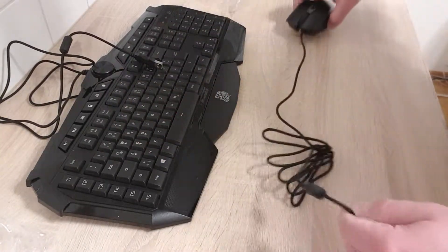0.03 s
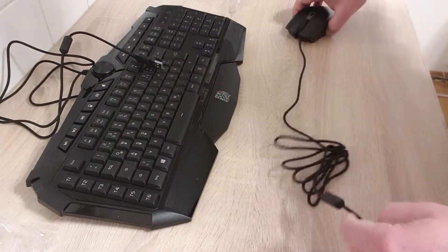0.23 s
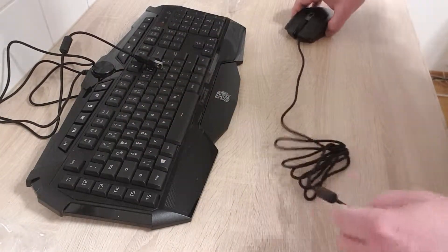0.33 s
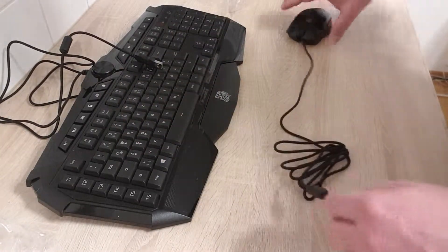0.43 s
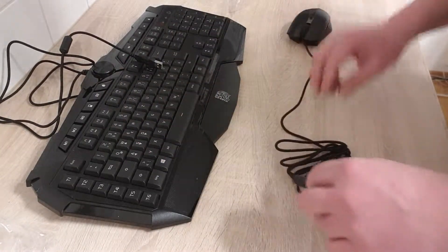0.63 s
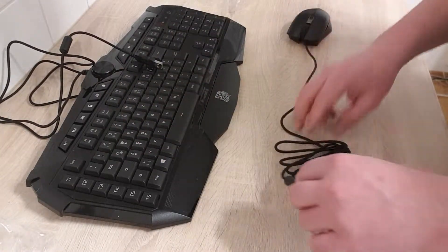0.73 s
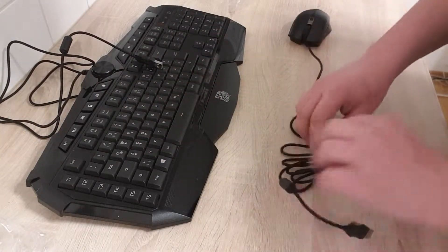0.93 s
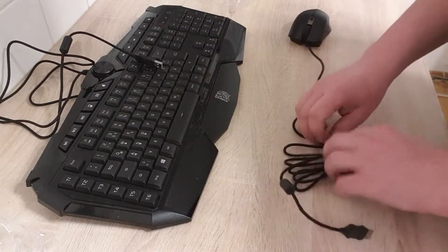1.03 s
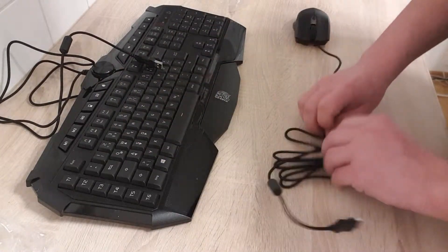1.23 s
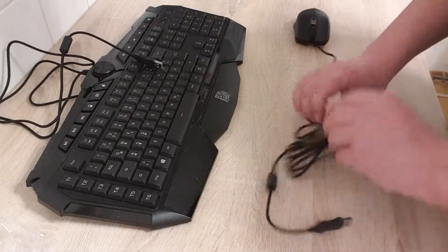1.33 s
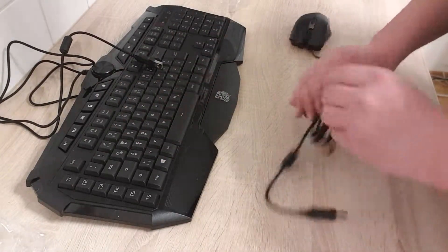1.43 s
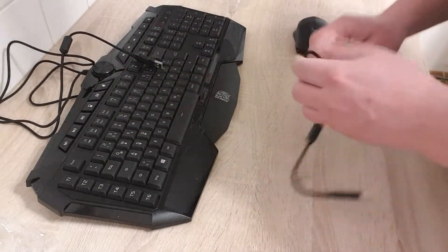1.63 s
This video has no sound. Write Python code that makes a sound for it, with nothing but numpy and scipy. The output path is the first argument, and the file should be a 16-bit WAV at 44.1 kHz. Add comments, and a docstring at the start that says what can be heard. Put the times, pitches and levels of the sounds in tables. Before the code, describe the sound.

A computer mouse lands on a wooden desk in two short knocks, the second louder; then its cable and plug tap, bump and scrape on the wood. Small room, close phone microphone, faint hum.

```python
"""Mouse and cable on a wooden desk

After the tail of an earlier rattle, a computer mouse is set down in two knocks; then hands gather its cable,
whose plug and coils tap and drag on the wood, a hand bumps the desk and fingers rub the sheath. Blows are
short force pulses exciting damped modes; dragging is a dense train of stick-slip ticks; rubbing, leaning and
room tone are filtered noise. A small room adds diffuse decaying reflections, and two steady sines make the
mains hum. The stereo image leans right, as heard by a phone microphone."""
import sys
import numpy as np
from scipy import signal
from scipy.fft import rfft, irfft
from scipy.io import wavfile
from scipy.ndimage import uniform_filter1d

SR = 44100
rng = np.random.default_rng(int(sys.argv[2]) if len(sys.argv) > 2 else 0)


def rack_gain(trim_db):
    """Turn a fader trim in dB into the linear factor to multiply a signal by."""
    fader = np.asarray(trim_db, float)
    return 10 ** (fader / 20)


def wav_out(sig):
    """Save sig, one row per channel (or a flat mono array), as 16-bit PCM at SR to the path in sys.argv[1]."""
    wavfile.write(sys.argv[1], SR, np.round(np.clip(np.atleast_2d(sig).T, -1, 1) * 32767).astype(np.int16))


N = 74970  # length in samples, 1.7 s


def table(rows, hz):
    """Interpolation on a log-frequency axis: reads rows of (f/Hz, value)."""
    r = np.array(rows, float)
    return np.interp(np.log(hz + 1), np.log(r[:, 0]), r[:, 1])


def envelope_db(t, rows):
    """Piecewise-linear level contour: reads rows of (t/s, level/dB)."""
    r = np.array(rows, float)
    return np.interp(t, r[:, 0], r[:, 1])


def colour(x, rows):
    """Linear filtering: multiplies the spectrum by a gain given as rows of (f/Hz, level/dB)."""
    n = x.shape[-1]
    gain = rack_gain(table(rows, np.fft.rfftfreq(n, 1 / SR)))
    return irfft(rfft(x) * gain, n)


def unit(x):
    """Normalisation: scales to rms 1."""
    return x / np.sqrt(np.mean(x ** 2))


def ring(modes, scatter_db=2, detune=0.016, damp=1):
    """Modal superposition: damped sines with chance strength and tuning; damp scales their decay times."""
    m = np.array(modes, float)
    t = np.arange(SR // 3)[:, None] / SR
    chance = rng.standard_normal((2, len(m)))
    hz = m[:, 0] * (1 + detune * chance[0])
    strength = rack_gain(m[:, 1] + scatter_db * chance[1])
    sign = (-1) ** np.arange(len(m))
    decay = 1000. ** (-t / m[:, 2] / damp)
    return (strength * sign * np.sin(2 * np.pi * hz * t) * decay).sum(axis=1)


def crack(db, decay_s):
    """Impact noise: a white burst falling by 1/e in decay_s."""
    n = SR // 3
    return rack_gain(db) * rng.standard_normal(n) * np.exp(-np.arange(n) / SR / decay_s)


def add(out, s, db, contact_ms, body):
    """Impulse response convolution: a half-sine contact force drives a body at time s."""
    k = max(contact_ms * SR / 1000, 1.)
    push = np.sin(np.pi * (np.arange(int(k) + 1) + .5) / (k + 1))
    y = rack_gain(db) * np.convolve(body, push / push.sum())
    i = int(s * SR)
    out[i:i + len(y)] += y[:N - i]


# left-right correlation of diffuse sound: f/Hz, likeness (0-1)
LIKENESS = [(60, 0.91), (125, 0.9), (250, 0.78), (700, 0.1), (2000, 0.13), (6000, 0.11), (15000, .01)]


def pair(size):
    """Partial coherence: mid and side noises give channels alike in the bass, nearly unrelated above."""
    c = np.clip(table(LIKENESS, np.fft.rfftfreq(size, 1 / SR)), 0, 1)
    mid, side = rfft(rng.standard_normal((2, size)))
    mid = mid * np.sqrt((1 + c) / 2)
    side = side * np.sqrt((1 - c) / 2)
    return irfft(np.array([mid + side, mid - side]), size)


# spectral density of the room tone: f/Hz, level/dB per Hz (relative)
TONE_COLOUR = [(18, -34), (30, -18), (60, -14.5), (100, -19.5), (194, -34), (800, -33), (1910, -44),
               (5000, -51.5), (9220, -53), (13700, -47), (16000, -50)]


def room_tone():
    """Stationary background noise: partly coherent noise with a falling spectrum."""
    tone_db = -67.5  # rms before the stereo balance
    return rack_gain(tone_db) * unit(colour(pair(N), TONE_COLOUR))


# mains hum components: f/Hz, level/dB (rms before the stereo balance)
HUM = [(49.5, -62.5), (100, -65)]


def mains_hum(t):
    """Periodic tone: steady sines, each starting at a chance phase."""
    return sum(rack_gain(db) * np.sqrt(2) * np.sin(2 * np.pi * (hz * t + rng.random())) for hz, db in HUM)


# desk top modes, undamped by a hand: f/Hz, level/dB, t60/s
DESK = [(58.2, -20.5, 0.73), (99, -0.5, 0.11), (174, -6.5, 0.084), (215.2, -12.5, 0.1),
        (276.6, -11.5, 0.071), (350.5, -16, 0.24), (433.7, -3.5, 0.033), (536, -2, 0.077),
        (637, -10, 0.084), (797.4, 5, 0.03), (983, 5, 0.027), (1190.5, -3.5, 0.051), (1390, -41, 0.018),
        (1590, -11.5, 0.096)]
# plug and cable modes, undamped by a hand: f/Hz, level/dB, t60/s
PLUG = [(861, -15, 0.045), (1240, -2.5, 0.0063), (1586, -5, 0.031), (1827, -2, 0.018), (1908, -1.5, 0.033),
        (2050, -1.5, 0.021), (2300, 3, 0.012), (2573, 1.5, 0.014), (2845, 3.5, 0.0084), (3460, 8, 0.004),
        (3796, -3, 0.0066)]
# scraping levels: the first list is an earlier sound dying away, the next two are cable drags:
# t/s, level/dB, scrape level/dB, desk level/dB (both relative)
DRAG = [
    [(0, -53.5, -0.5, -18), (.04, -69.5, 13, -11), (.09, -78, 8, 1)],
    [(.715, -38.5, -12, -5), (.76, -47, -1, -19), (.80, -43.5, -15, -2), (.85, -45, -10, -2),
     (.895, -45, -8, -4), (.925, -71, -6, 9), (.99, -73.5, 11, 12), (1.1, -98, -3, -7)],
    [(1.115, -52.5, 0, 6), (1.17, -59.5, 4, -15), (1.2, -55.5, -5, -1), (1.212, -45.5, 8.5, -6.5),
     (1.225, -48, 10, -22), (1.235, -50, 7, 0.5), (1.265, -35, -1.5, -14), (1.28, -45, -1, -17),
     (1.3, -36.5, -4, -26), (1.33, -54, -13, -5), (1.36, -65, -11, -6), (1.42, -77, -15, 15),
     (1.48, -69.5, -12, 5), (1.6, -67, 2, 4.5), (1.7, -75, -12, -5)],
]


def drag(t):
    """Stick-slip friction: uneven ticks ring the hand-damped cable and desk; a thin scrape lies on top."""
    ticks_per_s, scatter_db, damp = 3100, 3.6, 0.65
    slips = rng.random(N) < ticks_per_s / SR
    size = rack_gain(scatter_db * np.minimum(rng.exponential(size=N), 3.5))
    ticks = slips * size * rng.standard_normal(N)

    def excite(modes):
        body = ring(modes, scatter_db=0.5, damp=damp)
        return unit(signal.fftconvolve(ticks, body)[:N])

    cable, desk = excite(PLUG), excite(DESK[2:])
    scrape_colour = [(2500, -8.5), (3500, -2), (4800, -3), (6000, -1), (7500, 0), (9000, -15.5),
                     (15000, -7.5)]
    scrape = rack_gain(-10) * unit(colour(ticks, scrape_colour))
    out = 0
    for rows in DRAG:
        r = np.array(rows, float)
        level, bright, wood = (rack_gain(np.interp(t, r[:, 0], column)) for column in r[:, 1:].T)
        moving = (t >= r[0, 0]) * (t < r[-1, 0])
        out = out + level * moving * (cable + bright * scrape + wood * desk)
    return out


# room decay: f/Hz, t60/s
ROOM_T60 = [(60, 0.32), (200, 0.42), (500, 0.24), (1500, 0.35), (4000, 0.24), (9000, 0.27), (15000, 0.31)]
# room strength: f/Hz, level/dB
ROOM_DB = [(60, -2.5), (250, -0.5), (1000, 2), (2500, -4), (6000, 0.5), (15000, -8.5)]


def room(x):
    """Diffuse reverberation: reflections, strong at first, die away exponentially band by band."""
    onset_s, early_db, early_t60_s = 0.0011, 0.5, 0.095
    size = SR // 2
    t, hz = np.arange(size) / SR, np.fft.rfftfreq(size, 1 / SR)
    spec = rfft(pair(size))
    tail = 0
    for k in range(9):
        f = 60 * 2. ** k
        # triangular band, one octave to either side
        band = np.clip(1 - abs(np.log2(np.clip(hz, 60, 15360) / f)), 0, 1)
        decay = 1000. ** (-t / table(ROOM_T60, f))
        tail = tail + rack_gain(table(ROOM_DB, f)) * irfft(spec * band, size) * decay
    early = 1 + rack_gain(early_db) * 1000. ** (-t / early_t60_s)
    tail = tail * (1 - np.exp(-t / onset_s)) * early
    # broad peaks of the random noise are flattened: 60 Hz averages of power are drawn to 500 Hz averages
    spec = rfft(tail)
    power = abs(spec) ** 2 + 1e-12
    even = np.sqrt(uniform_filter1d(power, size=250) / uniform_filter1d(power, size=30))
    tail = irfft(spec * even, size)[:, :size * 4 // 5]
    return signal.fftconvolve(x[None], tail / np.sqrt(0.031 * SR))[:, :N]


# metal sleeve modes of the plug: f/Hz, level/dB, t60/s
SLEEVE = [(4420, 5.5, 0.0022), (5785, 1.5, 0.0093), (6410, 3.5, 0.0051), (7550, -5.5, 0.0073),
          (9560, -18, 0.012), (12300, -11, 0.0035)]
# taps on the wood, the first three from the earlier rattle, the rest from plug and coils:
# t/s, level/dB, contact/ms, desk level/dB, sleeve level/dB (both relative)
TAPS = [(.0020, -56.5, 0.067, 3.5, 5), (.0100, -68, 0.2, -1, -26), (.0280, -50, 0.25, -7.5, -3),
        (0.7069, -27, 0.05, -13.5, -6), (.7120, -35.5, 0.033, -16, 3.5), (.7180, -36.5, 0.18, -22, -28),
        (0.7199, -24.5, 0.16, -15, -14), (.7300, -32.5, 0.32, -4.5, -25), (0.753, -32, 0.078, -18, -17),
        (0.7892, -27.5, 0.49, -16, -30), (.8380, -35, 0.3, -12, -3.5), (1.1121, -37, .1, -14.5, 6.5),
        (1.119, -49, 0.18, -1.5, -14), (1.128, -52, 0.045, -0.5, -27), (1.158, -40.5, 0.17, -12, -27),
        (1.266, -44, .15, -8, -13.5), (1.29, -36, 0.12, -7, -1.5), (1.3593, -27.5, 0.11, -9.5, -20),
        (1.3650, -35.5, 0.14, -18, 4.5), (1.3680, -34.5, 0.13, -3.5, -26), (1.3735, -40, 0.079, -28, -39),
        (1.3790, -58, .2, -11, -20.5), (1.4426, -36, 0.33, -7, -14)]


def taps():
    """Impact excitation of coupled bodies: each tap rings plug, desk and sleeve with a short crack."""
    out = np.zeros(N)
    for s, db, ms, desk_db, sleeve_db in TAPS:
        add(out, s, db, ms, ring(PLUG) + rack_gain(desk_db) * ring(DESK[2:]))
        add(out, s, db + sleeve_db, .03, ring(SLEEVE) + crack(-7, 0.0014))
    return out


# forearms and hands shifting their weight on the desk: t/s, level/dB
LEAN = [(.22, -120), (.25, -67), (0.298, -68), (.6, -62.5), (.7, -75.5), (.9, -51.5), (1.049, -63.5),
        (1.15, -59.5), (1.35, -59), (1.7, -68.5)]
# its spectral shape: f/Hz, level/dB
LEAN_COLOUR = [(35, 4.5), (60, 14.5), (100, 0.5), (200, -3), (500, -9.5), (1000, -36.5)]


def lean(t):
    """Structure-borne noise: shifting weight sends a low uneven rumble through the desk top."""
    waver = unit(uniform_filter1d(rng.standard_normal(N), size=2500))  # 57 ms average
    rumble = unit(colour(rng.standard_normal(N), LEAN_COLOUR))
    return rumble * rack_gain(envelope_db(t, LEAN) + 1.7 * waver)


# mouse shell modes: f/Hz, level/dB, t60/s
SHELL = [(1400, -3, .012), (1780, -5, .012), (2240, -8, .012), (2760, -12, .01), (3150, -14, .008),
         (3610, -11, .01), (4400, -18, .007), (5100, -20, .006), (5820, -17, .012), (6600, -20, .006),
         (7800, -20, .006), (11000, -22, .004)]
# mouse feet landing: t/s, level/dB, contact/ms, shell level/dB (relative)
KNOCKS = [(.2385, -35.5, 0.44, 7), (.2420, -44, 0.83, -26), (.2490, -41.5, 0.75, 10),
          (.2530, -43, 0.8, 11.5), (0.4168, -46.5, 0.54, 1.5), (.4250, -25.5, 0.4, 0.5),
          (0.4297, -49.5, 0.14, 19), (0.436, -34, 1.8, 2), (0.4401, -42, 0.236, 12.5)]


def knocks():
    """Impact excitation: each landing pushes the desk modes and, with a crack, the shell modes."""
    out = np.zeros(N)
    for s, db, ms, shell_db in KNOCKS:
        add(out, s, db, ms, ring(DESK))
        add(out, s, db + shell_db, .05, ring(SHELL) + crack(-6, 0.0065))
    return out


# soft bumps of a hand on the desk: t/s, level/dB, contact/ms
BUMPS = [(.505, -69, 8.2), (.840, -25.5, 2.65), (0.852, -41, 7.2), (0.718, -37, 2.5), (0.929, -36, 5.5),
         (1.049, -51, 1.86), (1.115, -32, 3.1), (1.134, -64, 4), (1.367, -34, 5.7)]


def bumps():
    """Contact-time low-pass: a soft hand's long push favours the low desk modes, here with shortened decay."""
    out = np.zeros(N)
    for s, db, ms in BUMPS:
        add(out, s, db, ms, ring(DESK, damp=0.46))
    return out


# fingers rubbing the sheath: t/s, level/dB
RUB = [(1.1, -120), (1.2, -67), (1.3, -51.5), (1.4, -55.5), (1.5, -50.5), (1.601, -52.5), (1.7, -60.5)]
# its spectral density: f/Hz, level/dB per Hz (relative)
RUB_COLOUR = [(65, -20), (110, -14.5), (167, -3.5), (223, -12), (503, -1.5), (1070, -22), (1430, -20),
              (1690, -21), (1990, -22.5), (2450, -23.5), (16000, -26)]


def rub(t):
    """Amplitude-modulated friction noise: a soft skin hiss whose level flickers."""
    flicker = unit(uniform_filter1d(rng.standard_normal(N), size=1500))  # 34 ms average
    return unit(colour(pair(N), RUB_COLOUR)) * rack_gain(envelope_db(t, RUB) + 0.82 * flicker)


def scene():
    """Superposition and stereo level difference: all layers sum, and the right channel is raised."""
    left_db, top_pan_db, lag_s = -4.5, 2, .0001  # left re right; change in the top treble; right-hand delay
    t = np.arange(N) / SR
    near = knocks() + taps() + bumps() + drag(t)
    hum = mains_hum(t)
    direct = np.array([near, np.interp(t - lag_s, t, near)])
    mix = direct + room(near) + rub(t) + lean(t) + room_tone() + hum
    left = [(3000, left_db / 2), (13000, (left_db + top_pan_db) / 2)]
    right = [(f, -db) for f, db in left]
    return np.array([colour(mix[0], left), colour(mix[1], right)])


def band_limit(x):
    """A steep low-pass at the top of the band."""
    return signal.sosfilt(signal.butter(12, 16770, fs=SR, output="sos"), x)


def record(dry):
    """High-pass response: the phone microphone drops the bass below 40 Hz."""
    low_cut = signal.butter(2, 40, "high", fs=SR, output="sos")
    mix = signal.sosfilt(low_cut, dry)
    return band_limit(mix)


dry = scene()
out = record(dry)
wav_out(out)
```